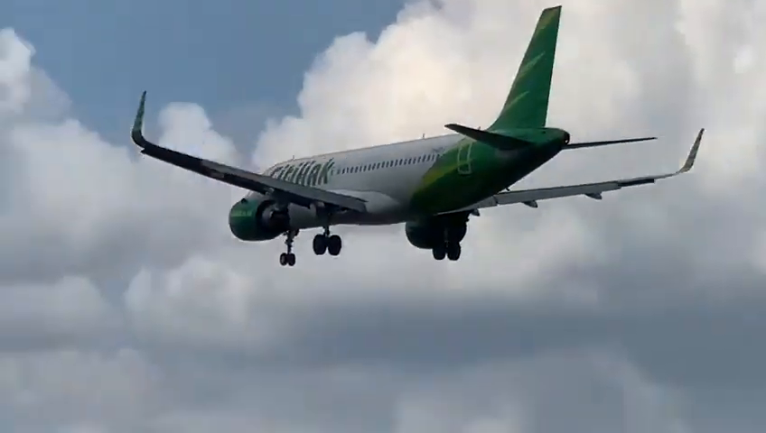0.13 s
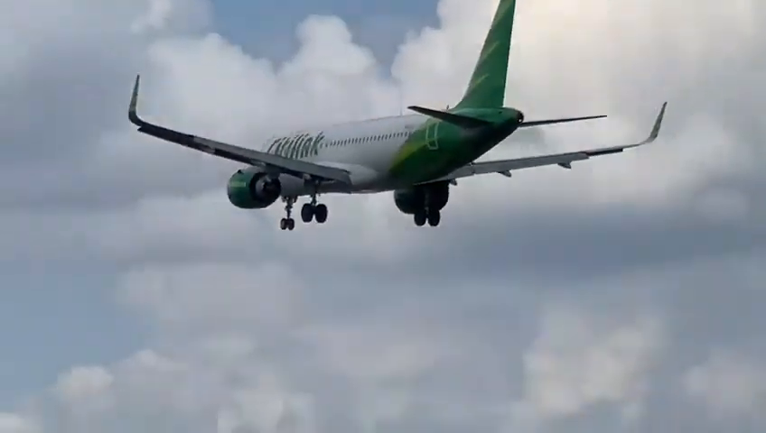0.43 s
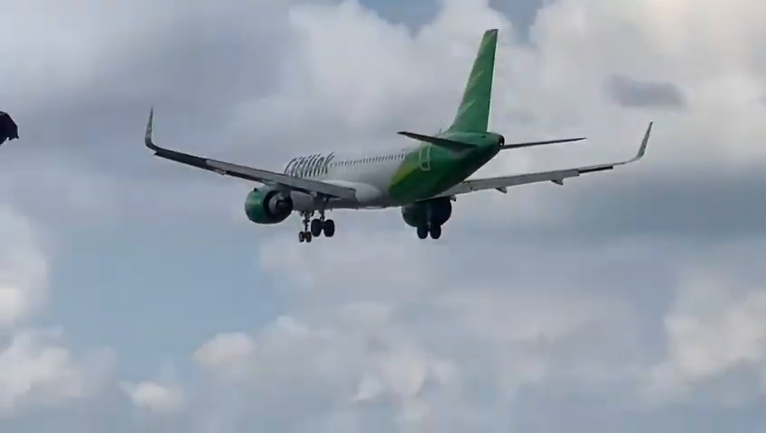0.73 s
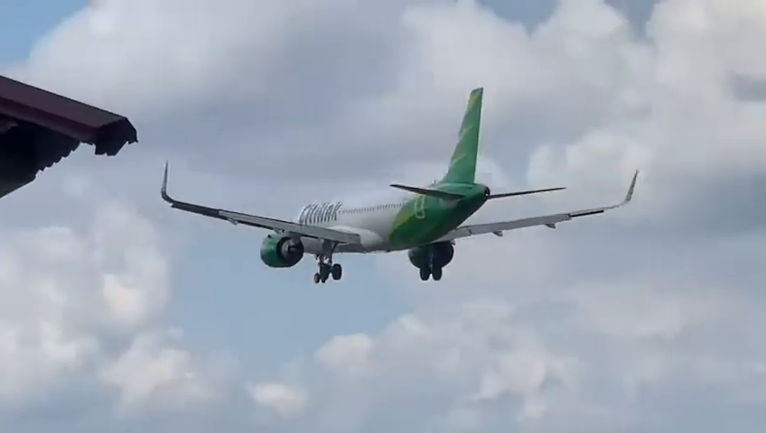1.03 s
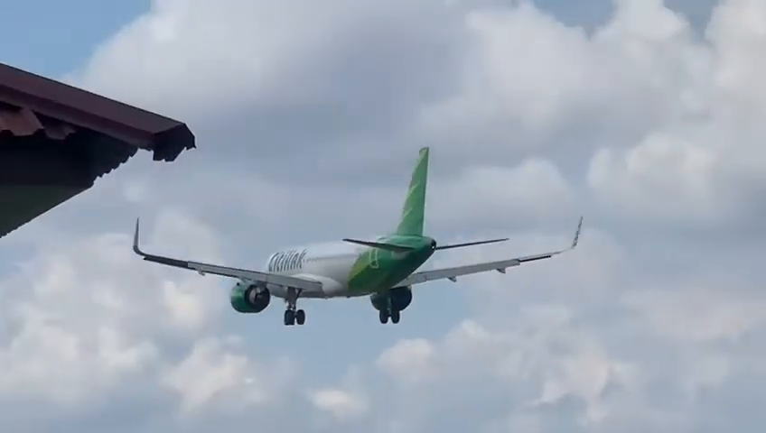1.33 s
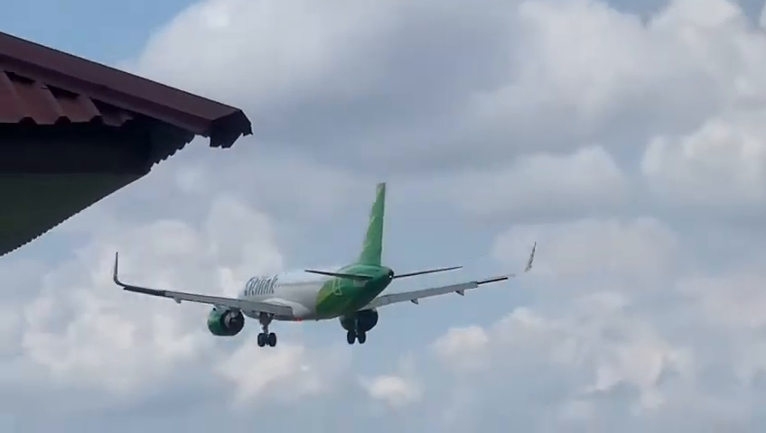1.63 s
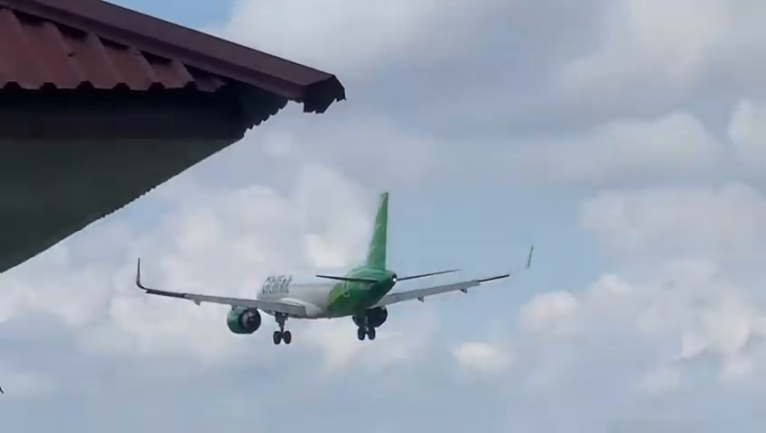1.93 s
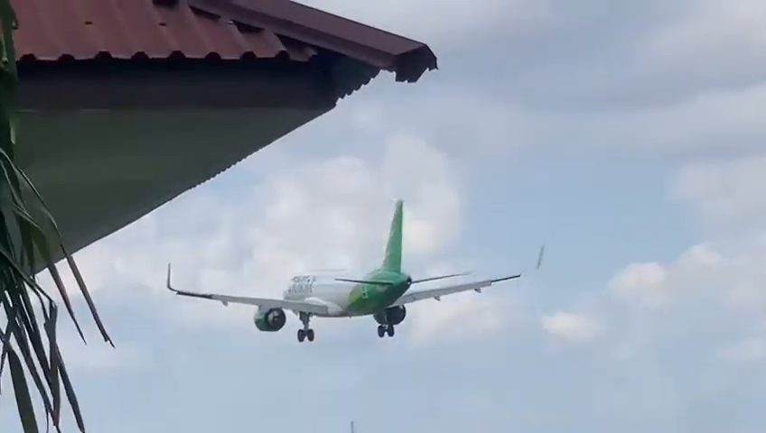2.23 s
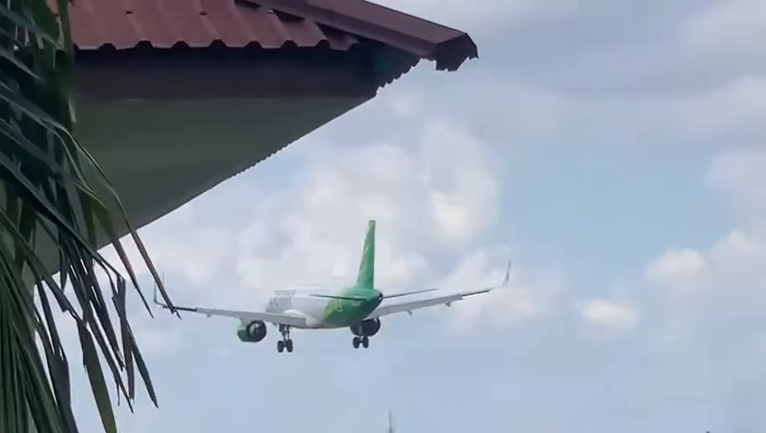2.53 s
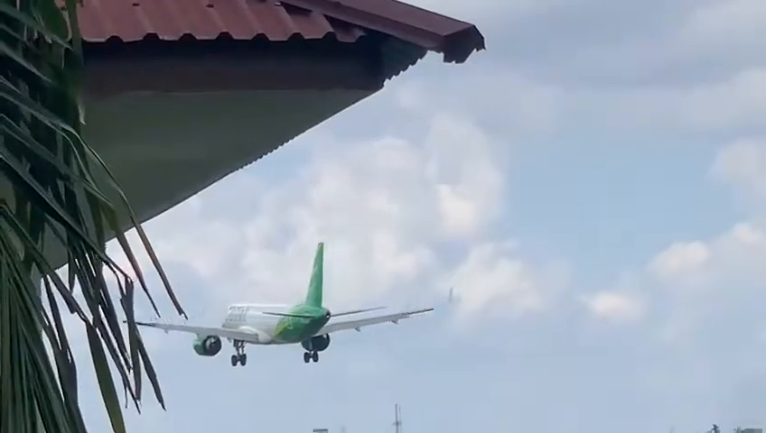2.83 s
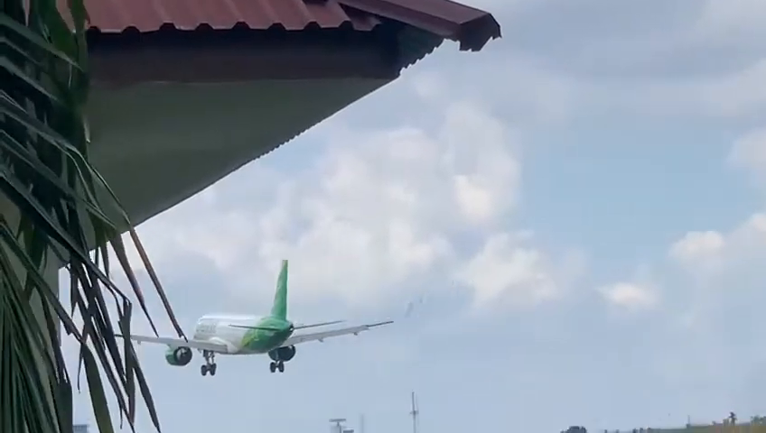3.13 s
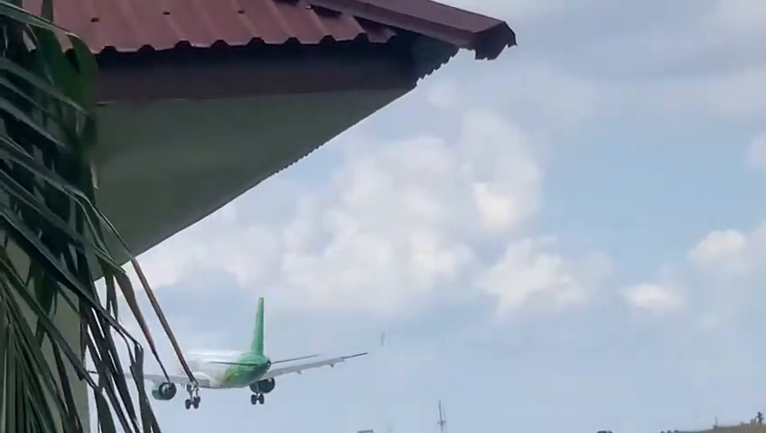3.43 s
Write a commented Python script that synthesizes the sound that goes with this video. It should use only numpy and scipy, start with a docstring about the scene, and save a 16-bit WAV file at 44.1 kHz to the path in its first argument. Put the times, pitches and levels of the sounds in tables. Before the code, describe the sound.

Receding jet roar with a wavering hollow tone and thin whine, outdoors on a two-port microphone; a distant rooster crows early, brief chirps and a soft wind bump follow, and a low motor drone ends it.

```python
"""A jet airliner, just past overhead and gliding away: exhaust roar, deep rumble and air rush are shaped noise,
the hiss dulled by the lengthening air path, with a ground-echo comb sweeping slowly up through roar and rush.
A hollow airframe tone and a thin engine whine, both sines, sink a little in pitch.
Far off to the left a rooster crows in ten harmonics, and small birds chirp and trill in gliding sines.
A distant motor drones, and a puff of wind bumps the two-port microphone over the outdoor background."""
import sys
import numpy as np
from scipy import signal
from scipy.fft import rfft, irfft, next_fast_len
from scipy.io import wavfile
from scipy.ndimage import uniform_filter1d, map_coordinates

SR = 44100
rng = np.random.default_rng(int(sys.argv[2]) if len(sys.argv) > 2 else 0)


def digitize_waveform(pressure):
    """Quantize a signal to 16-bit integers and store it at the path in sys.argv[1].

    Rows of a 2-D input are taken as channels; values are limited to [-1, 1].
    """
    field = np.atleast_2d(pressure).T
    bounded = np.clip(field, -1, 1)
    quanta = np.round(bounded * 32767).astype(np.int16)
    wavfile.write(sys.argv[1], SR, quanta)


N = 157437

# Deep rumble of the exhaust: (time [s], level [dB])
RUMBLE_LEVEL = [(0, -33), (.25, -37.5), (.45, -34), (.62, -31), (.75, -36), (1.2, -41.5), (1.32, -31),
                (1.45, -36), (1.95, -39), (2.55, -37.5), (2.75, -36.5), (3.1, -36), (3.57, -41)]
# Its spectrum: (frequency [Hz], density [dB per Hz])
RUMBLE_SPECTRUM = [(25, -32.5), (40, -29), (60, -17), (85, -6), (120, 0.5), (150, -11.5), (210, -29),
                   (500, -120)]
# Low roar of the jets, before its gain and the air path: (time [s], level [dB])
ROAR_LEVEL = [(0, -30.5), (.3, -30.8), (.5, -30), (.95, -32.5), (1.32, -31), (1.6, -33), (1.77, -35.5),
              (1.88, -33), (2.15, -33.5), (2.45, -36), (2.85, -35.5), (3.57, -35.5)]
# Its spectrum before the air path: (frequency [Hz], density [dB per Hz])
ROAR_SPECTRUM = [(90, -31), (140, 4), (170, 4), (250, 1), (330, -.5), (400, 0.5), (480, -1.5), (560, -10.5),
                 (750, -29.5), (3000, -120)]
# Rush of air over flaps, gear and fans, before its gain and the air path: (time [s], level [dB])
RUSH_LEVEL = [(0, -35), (.2, -37), (.45, -35.5), (.56, -37.5), (.83, -38.5), (1.25, -39.5), (1.5, -39),
              (1.66, -39.5), (1.76, -42), (2.05, -42), (2.45, -43.5), (3.25, -44.5), (3.57, -46.5)]
# Its spectrum before the air path: (frequency [Hz], density [dB per Hz])
RUSH_SPECTRUM = [(250, -37.5), (550, 2), (800, 4), (980, 2), (1150, -2), (1450, 0), (1800, -5.5),
                 (2350, -2.5), (2750, -7.5), (3300, -3), (4050, -12), (4550, -5), (5000, -12), (5700, -10),
                 (6700, -13.5), (7400, -20.5), (8100, -17.5), (9000, -27), (11000, -32.5)]
# Extra loss of the rush as the air path grows: (frequency [Hz], loss rate [dB per s])
AIR_LOSS_RATE = [(700, 0.5), (1500, 0.84), (3000, 0.94), (6000, 3), (8000, 3), (10500, 10.5)]
# Airframe tone: (time [s], level [dB])
TONE_LEVEL = [(0, -42), (.15, -42), (.22, -37), (.38, -36), (.48, -29), (.62, -27.5), (.7, -31), (.81, -33),
              (.86, -43), (.9, -33), (1.08, -32.5), (1.13, -38), (1.2, -32.5), (1.42, -33.5), (1.55, -38),
              (1.72, -35.5), (1.78, -47), (1.83, -37), (1.88, -42), (1.95, -32), (2.01, -52), (2.11, -48),
              (2.15, -35.5), (2.25, -37), (2.31, -46), (2.39, -51), (2.46, -33.5), (2.54, -46), (2.63, -35),
              (2.75, -52), (2.83, -40), (2.93, -40), (2.98, -49), (3.08, -41), (3.57, -47)]
# Distant motor's fundamental: (time [s], level [dB])
MOTOR_LEVEL = [(0, -58), (1.9, -54), (3.2, -52), (3.28, -36), (3.57, -36)]
# Outdoor background: (frequency [Hz], density [dB per Hz])
BACKGROUND_SPECTRUM = [(25, -23), (55, 10.5), (110, -2.5), (300, -4), (1000, -20.5), (3000, -37.5),
                       (7000, -39), (8200, -27.5), (9000, -49.5), (9700, -69)]
# Rooster's long note, before throat and jitter: (time [s], pitch [Hz], level [dB])
CROW_NOTE = [(.28, 590, -58), (.43, 612, -53), (.5, 636, -54), (.72, 637, -54), (.93, 659, -50),
             (1.1, 660, -48), (1.2, 666, -52), (1.3, 659, -50), (1.47, 668, -53), (1.55, 636, -50),
             (1.66, 622, -55)]
# Resonances of its throat and beak: (frequency [Hz], gain [dB])
CROW_RESONANCES = [(650, -7), (1250, 2.5), (1340, 3), (1980, -10), (2640, -8), (3150, 2), (3300, 2),
                   (3960, -7.5), (4620, -4), (5300, -16), (5950, -20), (6600, -14)]
# Bird chirps, pitch before roughness: (start [s], length [s], peak pitch [Hz], peak level [dB])
CHIRP_NOTES = [(2.217, .06, 3520, -53), (2.343, .06, 3850, -53.5), (2.37, .05, 3560, -53.5),
               (2.453, .045, 3920, -56), (2.485, .07, 3480, -53), (2.515, .05, 3760, -55)]
# Wind puff: (frequency [Hz], density [dB per Hz])
PUFF_SPECTRUM = [(20, -9), (45, -3.5), (68, -5), (110, -11), (250, -35), (600, -120)]
# Thin high trill, before roughness and flutter: (time [s], pitch [Hz], level [dB])
TRILL_NOTE = [(2.6, 5450, -110), (2.72, 5450, -66), (3.15, 5550, -66), (3.26, 5750, -60), (3.33, 5600, -68),
              (3.45, 5600, -110)]
# Likeness of noise at the two microphone ports: (frequency [Hz], likeness [0 to 1])
PORT_LIKENESS = [(60, .99), (130, .996), (300, .99), (450, .985), (700, .91), (1000, .78), (1300, .55),
                 (1550, .82), (2400, .8), (3500, .55), (4500, .55), (5600, .35), (6500, .8), (7800, .35),
                 (9300, .5), (10200, .95)]
# Phase by which the left port leads: (frequency [Hz], lead [rad])
LEFT_LEAD = [(400, 0), (780, -.25), (1120, .65), (1950, -.65), (2600, .4), (3250, 2.05), (4200, 1.55),
             (5000, 2.3), (5700, .5), (6500, .2), (7250, 2.8), (8100, 1.4), (8900, 2.9), (9900, 0)]
# Level of the left port over the right: (frequency [Hz], balance [dB])
PORT_BALANCE = [(100, 0), (600, 0), (1250, 2), (2200, -.3), (4500, -.3), (5700, -3.5), (6500, -.3),
                (9000, -1.5), (10200, 0)]

# Ground echo: comb spacing at the start, its rise, echo strength, and where rough ground halves the echo
GROUND_HZ, GROUND_RISE_HZ_PER_S, GROUND_SHARE, GROUND_TOP_HZ = 224, 35, .48, 720
# Turbulence: narrow lasting streaks and broad brief surges, depth [dB] and size (bins, frames)
STREAK_DB, STREAK_SIZE = 1.6, (3, 10)
SURGE_DB, SURGE_SIZE = 1.1, (12, 3)
SURGE_FROM_HZ = 900  # longer waves bend around the eddies and surge less
# Airframe tone's pitch once the aircraft flies straight away
TONE_HZ = 453
# Fraction by which the aircraft's tones start higher, and how fast it decays
DOPPLER_EXCESS, DOPPLER_SETTLE_S = .025, 1.3
# Amplitude share of the tone scattered by turbulence, its growth, its approximate half width
SCATTER, SCATTER_PER_S, SCATTER_HZ = .2, .05, 12
# Engine line: pitch straight away, level at the start, fade
WHINE_HZ, WHINE_DB, WHINE_FADE_DB_PER_S = 1482, -52.5, 4
MOTOR_HZ, MOTOR_SECOND_DB = 57.4, -18.5  # mean firing rate, octave relative to the fundamental
BACKGROUND_DB = -36.5
# The crow's clean span, and its fractional pitch scatter outside and inside that span
CROW_CLEAN_S, CROW_ROUGH, CROW_JITTER = (.48, 1.46), .018, .002
CHIRP_ARCH = 0.094  # fraction of the pitch by which a chirp starts and ends lower
BIRD_LEAD_S = .00013  # the birds are to the left: that port hears them earlier
PUFF_S, PUFF_WIDTH_S, PUFF_DB = 2.3, 0.027, -36  # centre, width, peak level
TOP_HZ = 11250  # microphone band limit


def amp(db):
    """Decibels to gain."""
    return 10 ** (np.asarray(db) / 20)


def unit(x):
    """Scaled to rms 1."""
    return x / np.sqrt(np.mean(np.abs(x) ** 2) + 1e-20)


def along(points, hz):
    """Interpolates (frequency [Hz], value) points on a log frequency axis."""
    f, v = np.transpose(points)
    return np.interp(np.log(hz + 1), np.log(f + 1), v)


def clock():
    """The time of each sample in seconds."""
    return np.arange(N) / SR


def curves(rows):
    """One value per sample for each column after the time."""
    s, *cols = np.transpose(rows)
    return [np.interp(clock(), s, c) for c in cols]


def wobble(rate):
    """A smooth random curve with rate knots a second."""
    return map_coordinates(rng.standard_normal(4096), [clock() * rate + 2], mode="mirror")


def cycles(hz):
    """Phase in radians of a moving frequency."""
    return 2 * np.pi * np.cumsum(hz) / SR


def filtered(x, response):
    """x passed through a complex response of frequency."""
    m = next_fast_len(N + SR // 2)
    hz = np.fft.rfftfreq(m, 1 / SR)
    return irfft(rfft(x, m) * response(hz), m)[..., :N]


def noise(spectrum):
    """Coloured noise of rms 1; mid and side parts set how alike the two microphone ports hear it."""
    def mid_side(hz):
        turn = np.arccos(np.clip(along(PORT_LIKENESS, hz), 0, .999)) / 2
        return amp(along(spectrum, hz)) * [np.cos(turn), np.sin(turn)]

    def ports(hz):
        half = np.array([[.5], [-.5]])  # left and right share each difference equally
        balance = amp(half * along(PORT_BALANCE, hz))
        return balance * np.exp(1j * half * np.interp(hz, *np.transpose(LEFT_LEAD)))

    mid, side = filtered(rng.standard_normal((2, N)), mid_side)
    return unit(filtered(np.array([mid + side, mid - side]), ports))


def turbulence_patches(shape, bins, frames):
    """Turbulent patches: a random field smoothed over frequency bins and time frames, at rms 1."""
    field = uniform_filter1d(rng.standard_normal(shape), bins, axis=0)
    return unit(uniform_filter1d(field, frames, axis=1))


def through_air(x, loss_rate=None):
    """The path from the aircraft: turbulent patches, the ground echo's moving comb and absorption."""
    hz, t, z = signal.stft(x, SR, nperseg=1024)
    hz_rows = hz[:, None]
    surge_db = SURGE_DB * hz_rows ** 2 / (hz_rows ** 2 + SURGE_FROM_HZ ** 2)
    turbulence_db = STREAK_DB * turbulence_patches(z.shape[1:], *STREAK_SIZE)
    turbulence_db = turbulence_db + surge_db * turbulence_patches(z.shape[1:], *SURGE_SIZE)
    echo = GROUND_SHARE / (1 + (hz_rows / GROUND_TOP_HZ) ** 2)
    spacing_hz = GROUND_HZ + GROUND_RISE_HZ_PER_S * t
    comb = np.abs(1 + echo * np.exp(2j * np.pi * hz_rows / spacing_hz))
    # absorption is counted from 1 s, so earlier sound is brighter
    lost_db = along(loss_rate, hz)[:, None] * (t - 1) if loss_rate else 0
    return signal.istft(z * comb * amp(turbulence_db - lost_db), SR, nperseg=1024)[1][:, :N]


def doppler():
    """The factor by which the aircraft's tones are raised as it turns from overhead to straight away."""
    return 1 + DOPPLER_EXCESS * np.exp(-clock() / DOPPLER_SETTLE_S)


def from_left(x, wet, t60):
    """A far call from the left: it reaches the left port first, with the decaying echo of the yards."""
    t = np.arange(SR // 2) / SR
    tail = rng.standard_normal((2, len(t))) * amp(-60 * t / t60)
    tail = tail / np.linalg.norm(tail[0])
    echo = signal.fftconvolve(x[None], tail, axes=1)[:, :N]
    sides = np.array([[1], [-1]])
    direct = filtered(x, lambda hz: np.exp(1j * np.pi * hz * BIRD_LEAD_S * sides))
    return direct + wet * echo


def jet_rumble():
    """The deepest part of the exhaust noise, as a low band of noise with a moving level."""
    level_db, = curves(RUMBLE_LEVEL)
    return amp(level_db) * noise(RUMBLE_SPECTRUM)


def jet_roar(gain_db=0.3):
    """The low mixing noise of the exhaust, heard through the air and over the ground."""
    level_db, = curves(ROAR_LEVEL)
    return amp(level_db + gain_db) * through_air(noise(ROAR_SPECTRUM))


def air_rush(gain_db=2):
    """Broad hiss of airframe and fans, duller with distance."""
    level_db, = curves(RUSH_LEVEL)
    return amp(level_db + gain_db) * through_air(noise(RUSH_SPECTRUM), loss_rate=AIR_LOSS_RATE)


def airframe_tone():
    """Air blowing over a cavity in the wing; turbulence scatters more of the tone as the path lengthens."""
    level_db, = curves(TONE_LEVEL)
    share = np.clip(SCATTER + SCATTER_PER_S * clock(), 0, .9)
    scattered = unit(wobble(2 * SCATTER_HZ) + 1j * wobble(2 * SCATTER_HZ))
    carrier = np.exp(1j * cycles(TONE_HZ * doppler()))
    received = carrier * (np.sqrt(1 - share ** 2) + share * scattered)
    return np.sqrt(2) * amp(level_db) * np.real(received)


def engine_whine(waver=.0012, twinkle_db=2.5):
    """A thin turbine line that sinks with the airframe tone and twinkles as it fades."""
    level_db = WHINE_DB - WHINE_FADE_DB_PER_S * clock() + twinkle_db * wobble(8)
    hz = WHINE_HZ * doppler() * (1 + waver * wobble(15))
    return np.sqrt(2) * amp(level_db) * np.sin(cycles(hz))


def motor(waver=.01):
    """A far motor's low drone: a wavering firing rate and its octave, much louder at the end."""
    level_db, = curves(MOTOR_LEVEL)
    phase = cycles(MOTOR_HZ * (1 + waver * wobble(8.7)))
    drone = np.sin(phase) + amp(MOTOR_SECOND_DB) * np.sin(2 * phase)
    return np.sqrt(2) * amp(level_db) * drone


def outdoor_background():
    """The steady noise of the open air around the microphone."""
    return amp(BACKGROUND_DB) * noise(BACKGROUND_SPECTRUM)


def rooster(fade_s=.03, flicker_db=2):
    """One long crow: hoarse start, clean held note, hoarse fall; each harmonic flickers on its way."""
    t = clock()
    hz, level_db = curves(CROW_NOTE)
    clean = (t > CROW_CLEAN_S[0]) & (t < CROW_CLEAN_S[1])
    jitter = np.where(clean, CROW_JITTER, CROW_ROUGH)
    phase = cycles(hz * (1 + jitter * wobble(120)))
    call = np.zeros(N)
    for k in range(1, 11):
        harmonic_db = along(CROW_RESONANCES, k * hz) + flicker_db * wobble(15.4)
        call += amp(harmonic_db) * np.sin(k * phase)
    start, end = CROW_NOTE[0][0], CROW_NOTE[-1][0]
    gate = np.clip(np.minimum(t - start, end - t) / fade_s, 0, 1)
    return from_left(np.sqrt(2) * gate * amp(level_db) * call, wet=.22, t60=.25)


def small_bird(rough=0.03):
    """Short, slightly buzzy chirps that arch up and down in pitch and loudness."""
    song = np.zeros(N)
    for start, length, peak_hz, db in CHIRP_NOTES:
        arch = np.sin(np.pi * np.clip((clock() - start) / length, 0, 1))
        hz = peak_hz * (1 - CHIRP_ARCH * (1 - arch) + rough * wobble(300))
        song += amp(db) * arch * np.sin(cycles(hz))
    return from_left(np.sqrt(2) * song, wet=.35, t60=.25)


def wind_puff():
    """One soft low bump of moving air on the microphone."""
    bump = np.exp(-((clock() - PUFF_S) / PUFF_WIDTH_S) ** 2)
    return amp(PUFF_DB) * bump * noise(PUFF_SPECTRUM)


def high_trill(rough=.025, flutter_db=3):
    """A faint, thin trill from the trees that lifts and swells just before it stops."""
    hz, level_db = curves(TRILL_NOTE)
    level = amp(level_db + flutter_db * wobble(40))
    trill = level * np.sin(cycles(hz * (1 + rough * wobble(500))))
    return from_left(np.sqrt(2) * trill, wet=.5, t60=.3)


def scene():
    """The airliner over the sounds of the neighbourhood."""
    airliner = jet_rumble() + jet_roar() + air_rush() + airframe_tone() + engine_whine()
    surroundings = motor() + outdoor_background() + wind_puff()
    birds = rooster() + small_bird() + high_trill()
    return airliner + surroundings + birds


def record(dry):
    """The microphone chain keeps nothing above its band limit."""
    return filtered(dry, lambda hz: hz < TOP_HZ)


dry = scene()
out = record(dry)
digitize_waveform(out)
```